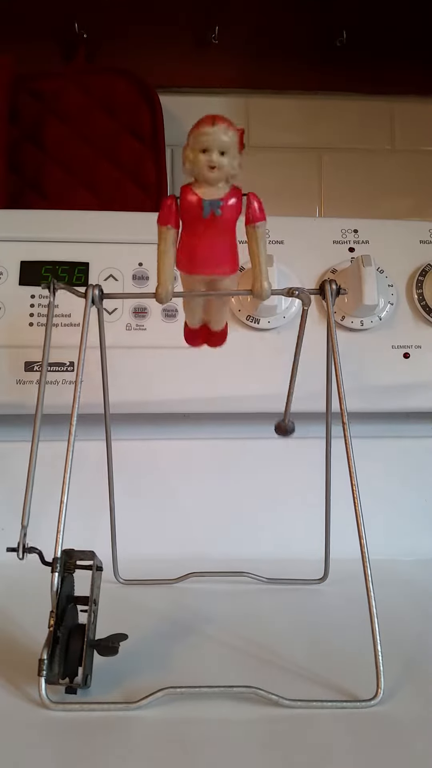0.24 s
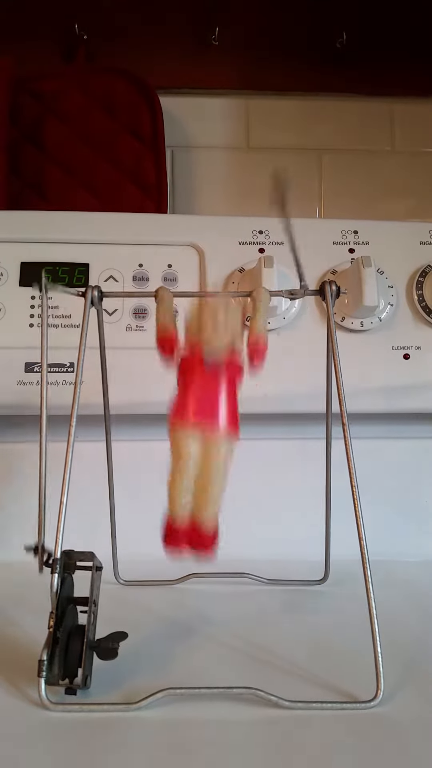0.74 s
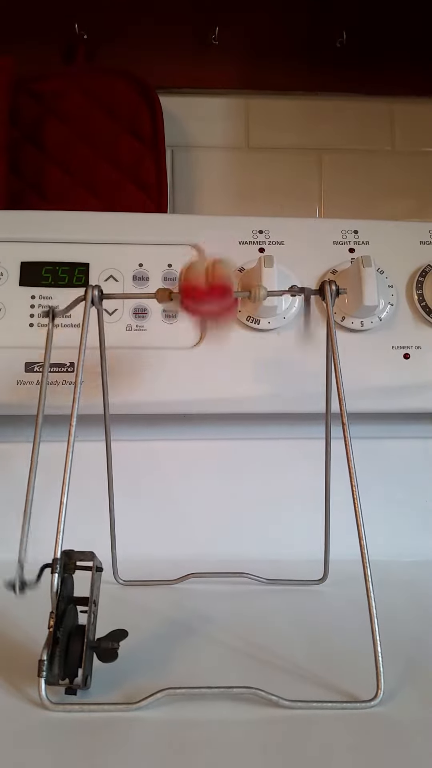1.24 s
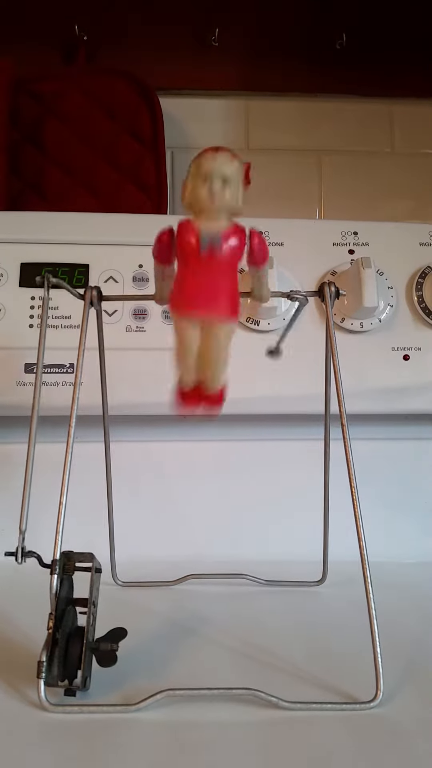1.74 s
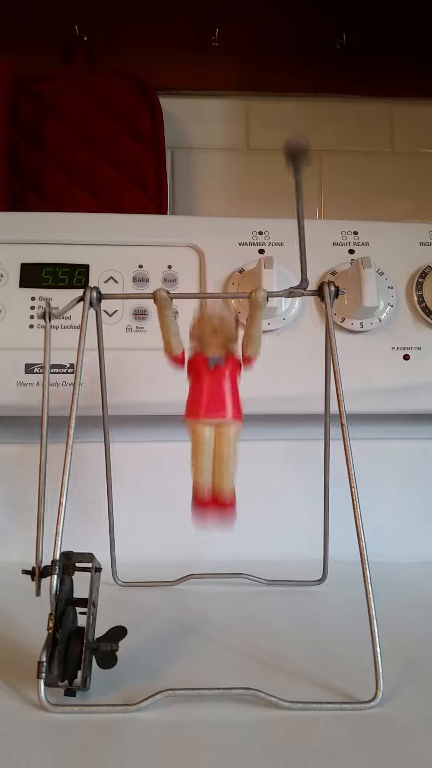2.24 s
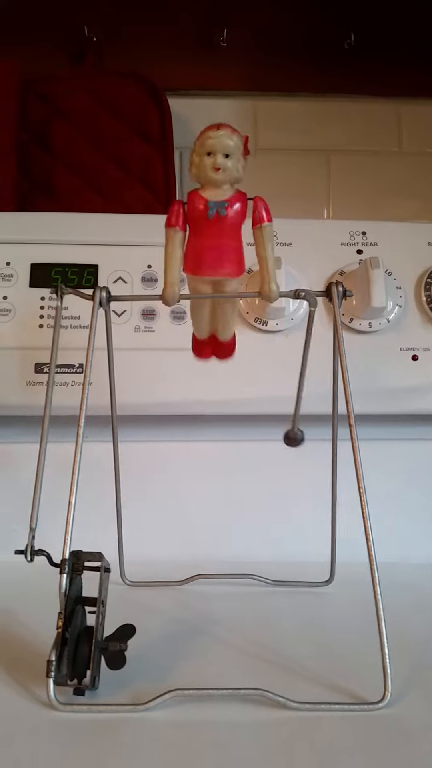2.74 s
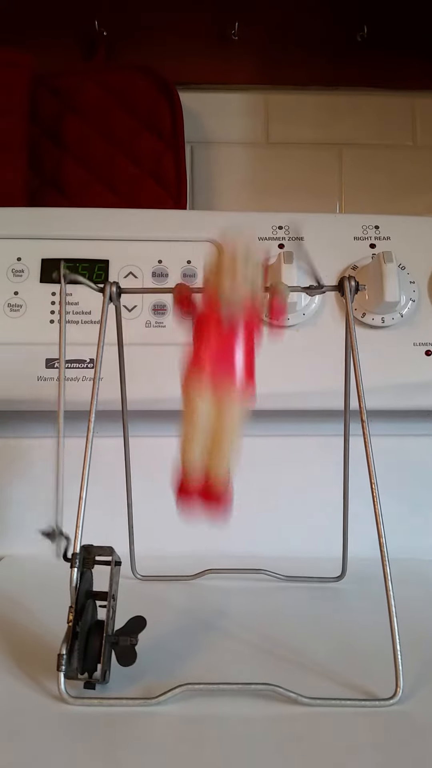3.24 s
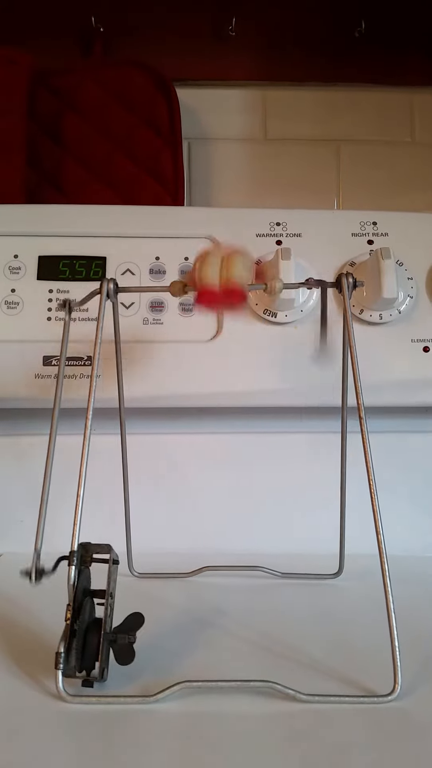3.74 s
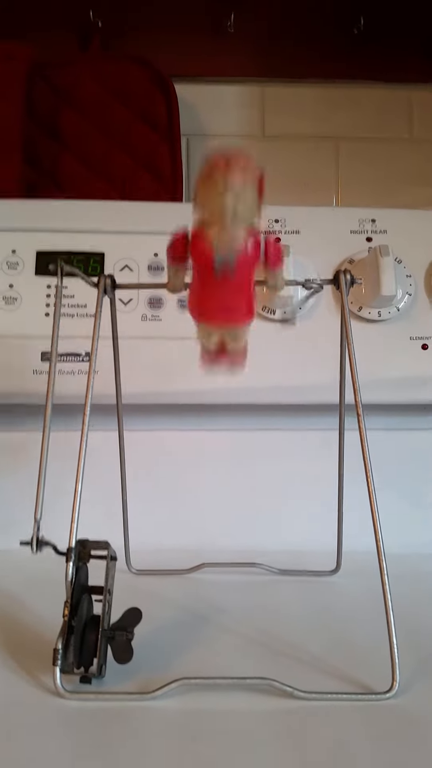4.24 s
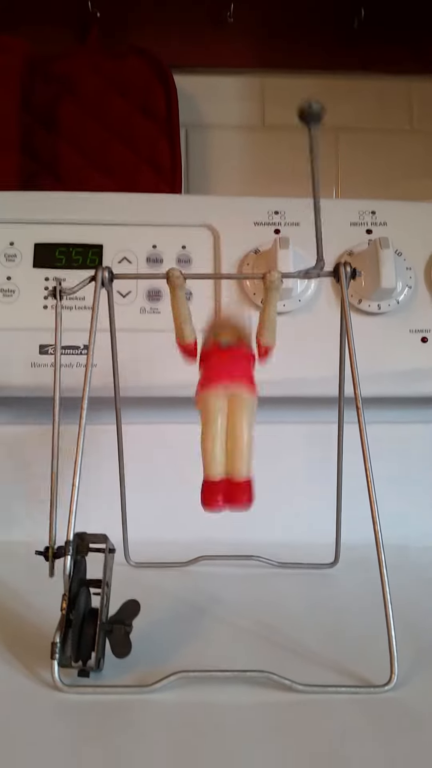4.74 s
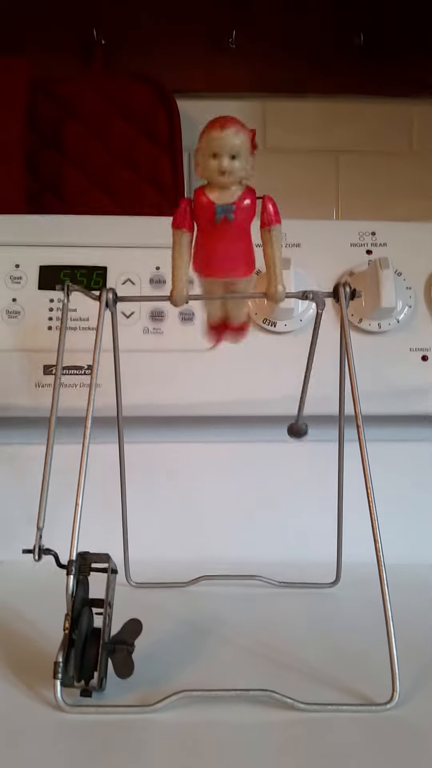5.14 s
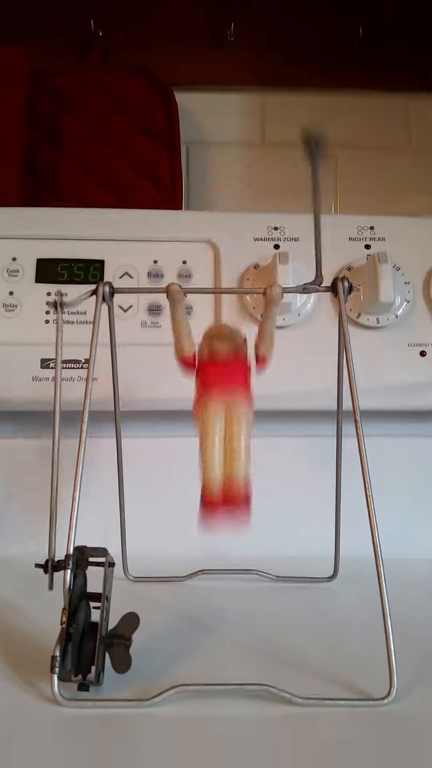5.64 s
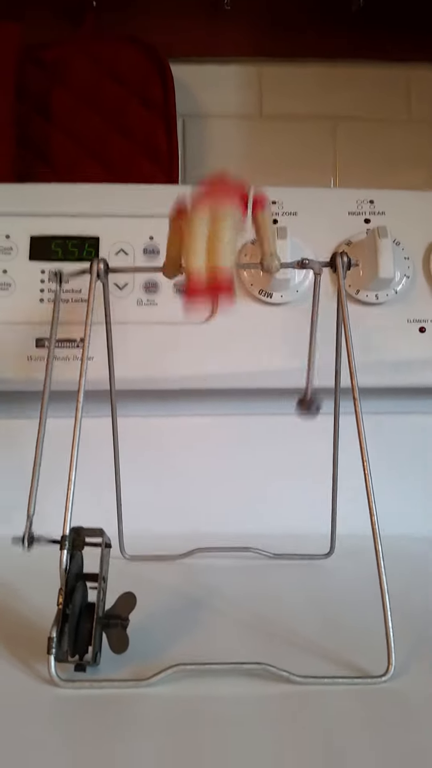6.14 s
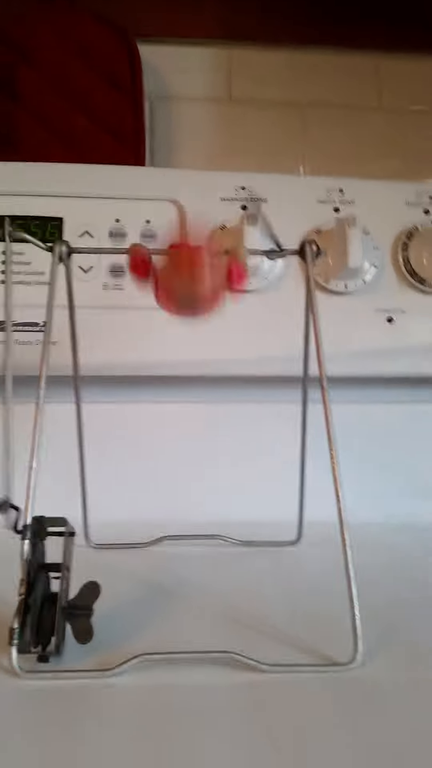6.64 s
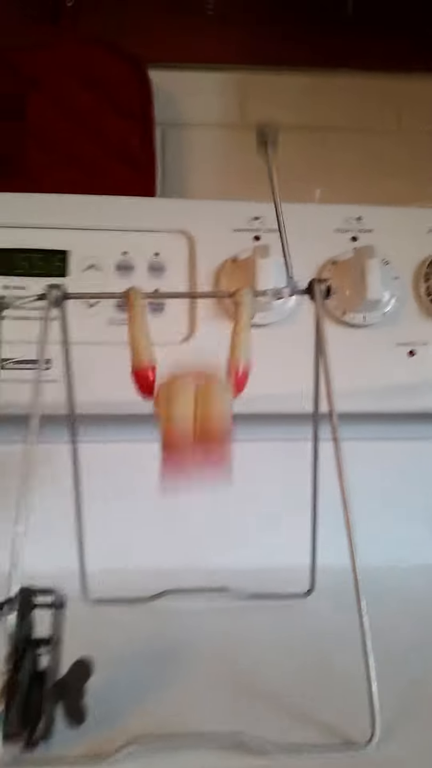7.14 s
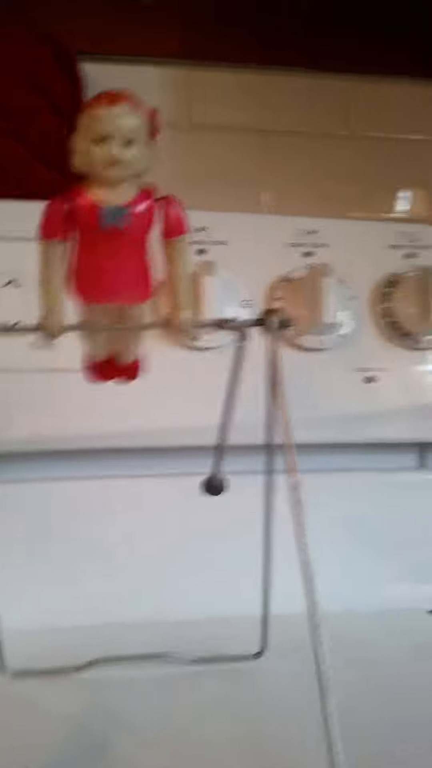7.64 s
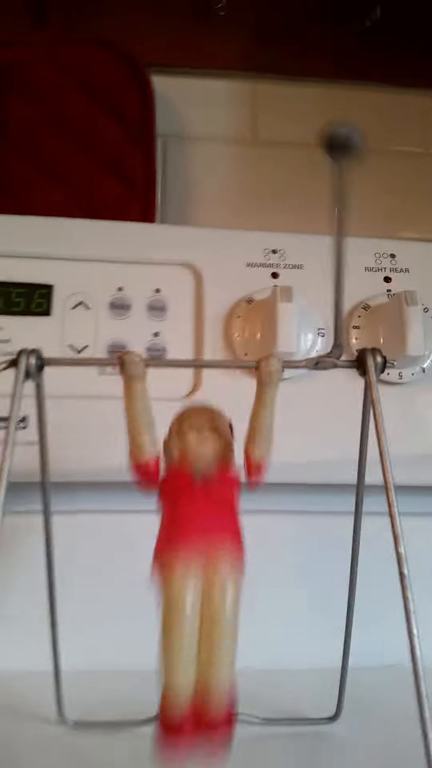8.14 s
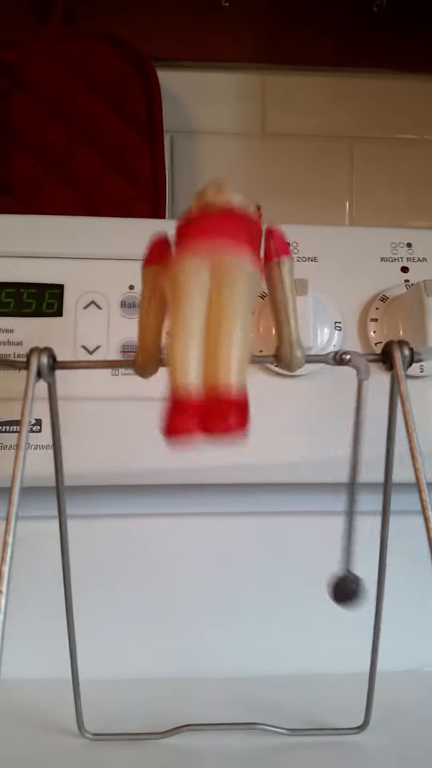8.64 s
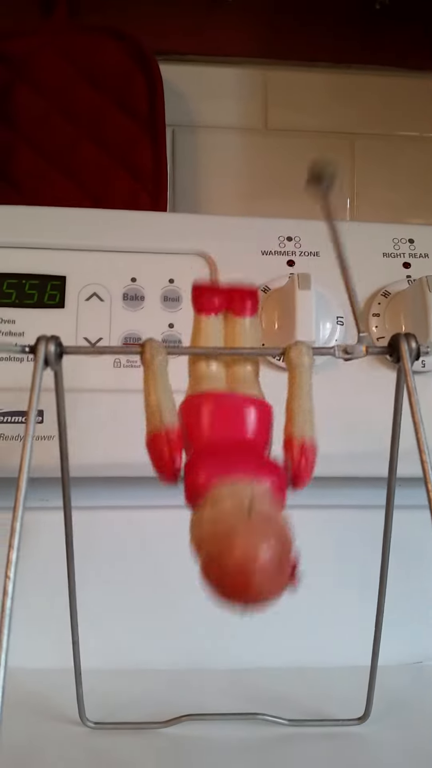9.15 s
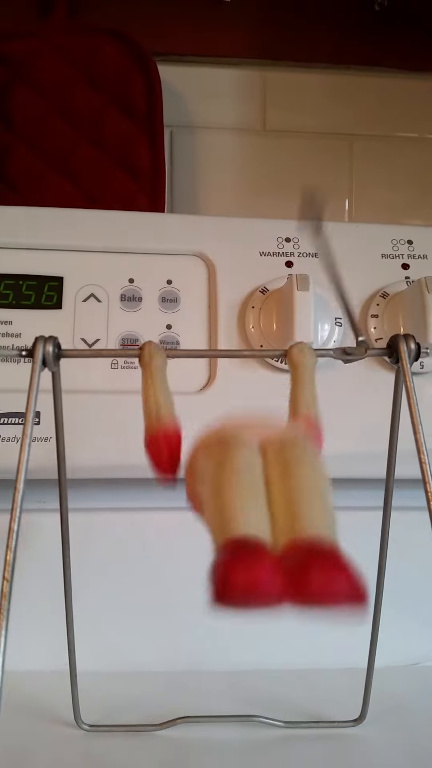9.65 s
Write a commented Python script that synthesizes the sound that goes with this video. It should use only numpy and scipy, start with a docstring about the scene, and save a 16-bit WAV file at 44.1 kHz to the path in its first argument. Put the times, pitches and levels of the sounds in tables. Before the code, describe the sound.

A wind-up acrobat toy ticks, clacks and knocks in uneven jerks on a metal stove top, with dull thumps and faint squeaks.

```python
"""From the start, quiet room air hisses, appliances drone and clockwork whirrs (shaped noise, sine tones).
Soon the crank jerks: gears tick, wire joints clack, a hollow acrobat knocks (bursts of noise, some ringing),
and the wire frame's feet thump a sheet-steel stove top (pushed resonances); the tiled kitchen echoes it all.
Now and then limbs slap the bar, and from 0.4 s a dry pivot squeaks (short wavering sines).
From 5.8 s fingers bump the hand-held phone (air pulses); around 7 s it turns away from the motor."""
import sys
import numpy as np
from scipy import signal
from scipy.fft import rfft, irfft, next_fast_len
from scipy.io import wavfile
from scipy.ndimage import uniform_filter1d, map_coordinates

SR = 44100
rng = np.random.default_rng(int(sys.argv[2]) if len(sys.argv) > 2 else 0)


def wav_out(sig):
    """Save sig, one row per channel (or a flat mono array), as 16-bit PCM at SR to the path in sys.argv[1]."""
    wavfile.write(sys.argv[1], SR, np.round(np.clip(np.atleast_2d(sig).T, -1, 1) * 32767).astype(np.int16))


N = 437031  # samples, about 9.9 s


def amp(db):
    """Turn decibels into a plain multiplier."""
    return 10 ** (np.asarray(db) / 20)


def unit(x):
    """Scale a signal to an rms of 1."""
    return x / np.sqrt(np.mean(x ** 2) + 1e-20)


def along(points, hz):
    """Read each column of (f/Hz, value, ..) rows on a log frequency axis."""
    f, *columns = np.transpose(points)
    return np.array([np.interp(np.log(hz + 1), np.log(f + 1), column) for column in columns])


def curves(rows):
    """Join (t/s, value, ..) rows with straight lines: one value per sample for each column."""
    seconds, *columns = np.transpose(rows)
    return [np.interp(np.arange(N) / SR, seconds, column) for column in columns]


def wobble(rate, size=N):
    """A smooth random curve through `rate` random points a second."""
    points = rng.standard_normal(int(size * rate / SR) + 4)
    return map_coordinates(points, [np.arange(size) * rate / SR])


def filtered(x, response):
    """Colour x by a frequency response whose mean power is made 1."""
    m = next_fast_len(N + SR // 2)
    gain = response(np.fft.rfftfreq(m, 1 / SR))
    gain = gain / np.sqrt(np.mean(abs(gain) ** 2))
    return irfft(rfft(x, m) * gain, m)[..., :N]


def modes(table):
    """A body rings at a few pitches: the wider a resonance, the sooner its ring dies."""
    def response(f):
        total = 0
        for k, (centre, width, db) in enumerate(table):
            resonance = 1j * f * width / (centre * centre - f * f + 1j * f * width)
            total = total + (-1) ** k * amp(db) * resonance  # neighbours have opposite signs
        return total
    return response


def chatter(s, db, life, rise, fall, lumps):
    """Strength of contact: each hit builds up, then falls 60 dB in its life, with uneven rebounds."""
    force, t = np.zeros(N + SR), np.arange(SR // 4) / SR
    for start, level, t60, up in zip(s, db, life, rise):
        build = (1 - np.exp(-1.5 * t / max(up, .0002))) ** 2
        decay = amp(level - 60 * (t / max(t60, .003)) ** fall)
        force[round(start * SR):][:len(t)] += decay * build
    return force[:N] * unit(lumps)


# how far the phone has turned away from the motor: t/s, share of the turn [0-1]
PHONE_TURN = [(0, 0.03), (6.7, 0.15), (7.3, 0.94), (8.5, 0.86), (9.91, 1)]


def turned(pair, gain):
    """Cross-fade from the colours facing the toy to those turned away; the right port hears later."""
    port_lag = 5 / SR  # s

    def lag(hz):
        return np.exp(-2j * np.pi * hz * port_lag * np.array([[0], [1], [0], [1]]))

    # rows: left facing, right facing, left turned, right turned
    heard = filtered(np.tile(pair, (2, 1)), lambda hz: gain(hz) * lag(hz))
    turn, = curves(PHONE_TURN)
    return heard[:2] * (1 - turn) + heard[2:] * turn


def ports(force, gain, alike, patchy_db=3):
    """Dense tiny impacts follow the force; patches of pitch and time stand out, partly shared by both ports."""
    z = signal.stft(rng.standard_normal((3, N)), nperseg=512)[2]
    patches = uniform_filter1d(rng.standard_normal(z.shape[1:]), size=3, axis=0)  # smooth over pitch
    patches = uniform_filter1d(patches, size=4, axis=1)  # smooth over time
    patchy_noise = signal.istft(z * amp(patchy_db * unit(patches)), nperseg=512)[1][:, :N]
    shared, *own = unit(patchy_noise)
    share = np.clip(alike, 0, 1)
    impacts = np.sqrt(share) * shared + np.sqrt(1 - share) * np.array(own)
    return turned(force * impacts, gain)


# colour of the quiet room air: f/Hz, relative level/dB per Hz
ROOM_AIR = [(15, -33), (25, -1.5), (170, -6.5), (223, 9.5), (317, -16), (405, -2), (677, -3.5),
            (1070, -14.5), (2350, -32.5), (5280, -47.5), (16000, -46.5)]
# appliances droning: f/Hz, level/dB before a 4.5 dB lift and wavering
APPLIANCES = [(48, -70), (288, -75)]


def background():
    """Room air is shaped noise; appliances drone as tones with slowly wavering level and phase."""
    air = unit(filtered(rng.standard_normal((2, N)), lambda hz: amp(along(ROOM_AIR, hz))))
    t, hum = np.arange(N) / SR, 0
    for hz, db in APPLIANCES:
        level = amp(db + 4.5 + 3.4 * wobble(2.6))
        hum = hum + level * np.sin(2 * np.pi * hz * t + 1.7 * wobble(3.6))
    return amp(-65) * air + hum


# how hard the clockwork runs between jerks: t/s, whirr level/dB before each layer's own trim
CLOCKWORK = [(0,-68),(.4,-75),(.72,-59.5),(1.1,-76),(1.45,-60.5),(2.13,-78.5),(2.4,-73),(2.87,-80),(3.15,-60.5),(3.6,-79.5),(4.04,-61),(4.62,-74),(4.71,-65.5),(5.45,-67.5),(5.8,-70),(6.9,-60),(7.13,-80.5),(7.4,-66.5),(7.9,-81.5),(8.25,-63),(8.66,-88.5),(9.05,-70),(9.91,-67.5)]
# loose metal parts clashing: t/s, gear tick level/dB before a 3.5 dB lift,
# wire joint level/dB above the tick, tick chatter time [s]
CLASHES = [(.059,-24,-9,0.11),(.2345,-28,-5,0.011),(.237,-30,-8,0.034),(.258,-40.5,2.5,0.043),(.292,-48,6,.028),(.455,-53,2.5,0.1),(.524,-36.5,1,0.033),(.574,-49,-1.5,0.082),(.611,-21,-6,0.094),(.706,-37,-3.5,.041),(.765,-47,-17.5,0.017),(.853,-33,-6,.03),(.86,-19,-21,0.041),(.869,-18,-7,.051),(.89,-33.5,-0.5,.033),(.906,-42,-2.5,0.18),
           (1.196,-22,-5,.028),(1.203,-30,-1.5,0.047),(1.23,-38,5.5,.051),(1.325,-21,-16,0.013),(1.327,-20.5,-5.5,0.088),(1.403,-44,3,.048),(1.493,-48,-12,.012),(1.514,-40,-11,.012),(1.527,-46,-1,.04),(1.551,-31,-6,0.035),(1.564,-30,-1.5,0.051),(1.689,-17.5,-31,.021),(1.695,-19.5,-5.5,.059),(1.855,-51,3,.12),(1.931,-35.5,1.5,.03),
           (2.187,-24,-8.5,.051),(2.213,-47,1,.051),(2.291,-48.5,-5,0.043),(2.373,-56.5,-5.5,0.016),(2.399,-52.5,12.5,.018),(2.406,-43.5,-6,.031),(2.527,-23,-11,0.064),(2.636,-26.5,-11.5,.037),(2.652,-31,2.5,.023),(2.689,-42.5,2.5,0.055),(2.774,-44.5,-1,.029),(2.957,-40.5,4,.04),
           (3.03,-47,-3,.03),(3.06,-20,-7,.078),(3.097,-37,-3,.077),(3.153,-42,4,0.069),(3.297,-30,2,0.01),(3.319,-15,-30,.021),(3.324,-18.5,-5,0.034),(3.337,-32,-2,0.12),(3.688,-28.5,0,0.03),(3.697,-34.5,0,0.064),(3.842,-31.5,-6,0.045),(3.848,-17.5,-9.5,0.055),(3.883,-35.5,9,0.029),(3.933,-44,-4,.13),(3.977,-36.5,-1,.048),
           (4.002,-32.5,1.5,0.019),(4.04,-47.5,4,0.087),(4.072,-36,-4,.02),(4.083,-27.5,-1,0.029),(4.235,-36,-6,.04),(4.244,-14.5,-20,0.022),(4.251,-20.5,-5.5,0.055),(4.475,-41,11.5,0.025),(4.7,-65,-3,.05),(4.717,-27,-1,.087),(4.836,-64,15,0.12),(4.918,-42,7,.036),(4.943,-41.5,10.5,0.038),
           (5.065,-20.5,-6,.097),(5.192,-20,-6.5,.025),(5.205,-31,2,.054),(5.252,-36,4,.024),(5.327,-41.5,3,0.031),(5.421,-49,-19,0.0098),(5.508,-49,4,0.033),(5.534,-30,4.5,.025),(5.627,-25.5,-4,0.054),(5.637,-18,-5,0.074),(5.68,-39,5,0.12),(5.728,-36,0.5,.054),(5.794,-48,2.5,.028),(5.835,-45.5,9,0.048),(5.852,-43,5,0.17),(5.882,-13,-14,0.03),(5.891,-22,-1,.065),(5.986,-44,3.5,0.063),
           (6.156,-50.5,10,0.013),(6.211,-21,-2.5,0.012),(6.218,-24.5,3.5,0.036),(6.249,-46,9,0.026),(6.34,-22.5,-1.5,0.052),(6.355,-23.5,-1,0.027),(6.381,-43,7,0.04),(6.4915,-32,-1,0.011),(6.497,-37,3.5,0.04),(6.544,-32.5,-9,0.025),(6.578,-18,-8,0.019),(6.732,-16.5,-10,0.077),(6.977,-35.5,-9.5,.085),
           (7.2,-33,-5.5,.11),(7.324,-61.5,6,.073),(7.398,-53,10,0.031),(7.425,-48.5,7.5,.051),(7.548,-28.5,-8.5,0.1),(7.6742,-26,-5,.012),(7.678,-31.5,-4.5,.037),(7.689,-39.5,2,.075),(7.796,-48.5,3.5,.027),
           (8.001,-44.5,4.5,0.028),(8.108,-28,-3.5,.086),(8.193,-45,2,0.099),(8.264,-62,-9,.02),(8.337,-58,1,.04),(8.373,-28,-4.5,0.093),(8.7367,-41,5,0.017),(8.74,-46,4,.078),(8.906,-46,-3,0.045),(8.914,-33,-2,0.083),
           (9.14,-58,6,0.023),(9.164,-42,2,.02),(9.182,-40.5,3,0.034),(9.35,-48,-3,.04),(9.356,-34,-6.5,0.05),(9.362,-32.5,-2,0.088),(9.498,-53.5,9.5,.04),(9.533,-47,6,.015),(9.54,-55,10,0.12),(9.592,-30.5,3.5,.016),(9.699,-48,4.5,.063),(9.758,-27,-2.5,.08)]
# colour of the gears: f/Hz, then level/dB at left, right, left turned away, right turned away
GEAR_COLOUR = [(6000, -41, -26, -48.5, -54.5), (8450, -24.5, -12, -11.5, -16),
               (9240, -16.5, -16, -20, -0.5), (10550, -25.5, -4.5, -15, -5.5), (11750, -18, 2.5, -12, -8.5),
               (12940, -20.5, -12.5, -27.5, -7.5), (13800, -24, -15, -17, -10.5),
               (15370, -19.5, -25, -8.5, -9.5), (15800, -30.5, -23, -23, -19)]
# colour of the wire joints: f/Hz, then level/dB at left, right, left turned away, right turned away
WIRE_COLOUR = [(302, -12.5, 0.5, -18, -27), (1249, -7, -4, -5.5, -5), (2270, -12.5, -6, -9, -23),
               (3050, -12, -9.5, -9.5, -19), (4500, -6, -5.5, -1, -13.5), (5340, -2.5, -4.5, 3, -15),
               (5830, -4.5, -3, 1, -15.5), (7700, -3.5, -13, -1.5, -13), (8970, -18, -14.5, -9, -19.5),
               (10000, -40, -29, -34.5, -41.5)]


def metal():
    """Gear teeth tick brightly, wire joints clack lower; the gear train whirrs and drops stray ticks."""
    s, db, wire_db, life = np.transpose(CLASHES)
    whirr_db, = curves(CLOCKWORK)
    whirr = amp(whirr_db + 4.7 * wobble(60))

    # small chance ticks, 22 a second; those past the end are dropped
    at = rng.random(400) * 400 / 22
    size, tone = rng.standard_normal((2, 400))
    inside = at < N / SR
    stray_db = whirr_db[(at[inside] * SR).astype(int)] + 11.5 + 4 * size[inside]  # follows the whirr
    s, db = np.r_[s, at[inside]], np.r_[db, stray_db]
    wire_db = np.r_[wire_db, 3 + 5 * tone[inside]]
    life = np.r_[life, np.full(inside.sum(), 0.013)]

    rise = 0.057 * life
    rebounds = wobble(140)  # both layers shake with the same rebounds
    tick_lumps = amp(0.91 * rebounds + 3.84 * wobble(400))
    ticks = chatter(s, db + 3.5, life, rise, fall=1.35, lumps=tick_lumps)
    ticks += amp(-0.9) * whirr
    clack_lumps = amp(1.9 * rebounds + 2.5 * wobble(300))
    clacks = chatter(s, db + wire_db + 3.5, 1.293 * life, 2.06 * rise, fall=1.404, lumps=clack_lumps)
    clacks += amp(3.5) * whirr
    gears = ports(ticks, lambda hz: amp(along(GEAR_COLOUR, hz)), alike=0.17)
    return gears + ports(clacks, lambda hz: amp(along(WIRE_COLOUR, hz)), alike=0.24)


# blows on the hollow figure: t/s, level/dB before each layer's lift, chatter time [s]
BLOWS = [(.071,-36.5,0.09),(0.231,-26,0.034),(.287,-32,0.036),(0.523,-26.5,0.024),(0.544,-37,.026),(.613,-33.5,0.056),(0.643,-38,0.036),(0.697,-32,0.043),(.811,-39,0.029),(0.869,-34,0.054),(.941,-40,0.071),
         (1.021,-47,0.052),(1.153,-44,0.013),(1.197,-19.5,0.015),(1.205,-31,0.064),(1.299,-42,.02),(1.324,-30.5,0.13),(1.41,-34,0.027),(1.527,-27,0.015),(1.551,-26,0.033),(1.696,-24.5,0.032),(1.854,-37.5,.033),(1.931,-31,0.037),
         (2.199,-26.5,0.014),(2.214,-31,.026),(2.534,-34,0.08),(2.634,-23.5,0.032),(2.654,-33,0.051),(2.696,-36,0.026),(2.774,-41.5,0.032),(2.96,-29.5,.028),
         (3.03,-44.5,0.057),(3.063,-31,0.082),(3.15,-34,0.12),(3.297,-28,0.01),(3.327,-26,0.028),(3.412,-35.5,.04),(3.686,-26.5,0.069),(3.852,-28.5,0.061),(3.98,-30.5,.021),
         (4.002,-23.5,0.019),(4.02,-29.5,0.037),(4.084,-20.5,0.023),(4.252,-33.5,0.1),(4.377,-41,.04),(4.407,-41,0.12),(4.475,-22.5,0.025),(4.694,-41.5,0.089),(4.727,-23.5,0.069),(4.943,-32.5,0.025),
         (5.075,-27.5,0.084),(5.191,-17.5,0.031),(5.212,-21.5,0.024),(5.25,-28.5,0.024),(5.326,-36.5,0.021),(5.431,-52,.049),(5.536,-20.5,0.024),(5.637,-21,0.064),(5.694,-35,0.016),(5.722,-24.5,0.065),(5.753,-24,0.019),(5.9,-25,0.036),
         (6.149,-38,0.047),(6.207,-23,0.073),(6.351,-23,0.025),(6.372,-43,.036),(6.488,-25.5,0.012),(6.499,-34,0.094),(6.578,-31,0.038),(6.739,-26.5,0.057),(6.862,-38,0.021),(6.978,-35.5,0.05),
         (7.212,-28.5,0.097),(7.326,-46.5,0.039),(7.426,-37,0.032),(7.561,-34.5,0.068),(7.672,-27,0.061),(7.73,-35.5,0.019),(7.798,-43.5,.024),(7.974,-43.5,0.036),
         (8.002,-38,0.047),(8.111,-32.5,0.084),(8.185,-36.5,0.013),(8.204,-31.5,.039),(8.231,-36.5,0.026),(8.339,-37,0.02),(8.384,-33,0.043),(8.735,-33,0.049),(8.916,-43.5,0.08),
         (8.99,-46,0.065),(9.1,-48,.03),(9.122,-39.5,0.017),(9.145,-35,0.022),(9.162,-34,.02),(9.183,-28.5,0.019),(9.366,-34,0.073),(9.497,-42,0.041),(9.527,-43,0.089),(9.59,-28,0.037),(9.697,-41.5,0.16),(9.766,-24.5,0.06),(9.791,-29,.023)]
# limbs slapping the bar, short and broad: t/s, level/dB
LIMB_SLAPS = [(.234, -35), (1.196, -33), (1.552, -31), (1.573, -30), (3.689, -35), (4.086, -23),
              (4.477, -32), (5.535, -35), (6.211, -32), (6.579, -32), (7.674, -37), (9.592, -29)]
# resonances of the thin shell: f/Hz, width [Hz], relative level/dB
SHELL_MODES = [(832, 56, -10), (1078.5, 98.5, 2.5), (1224.3, 60, 2), (1590, 20, -23), (1599, 35, -14.5),
               (1962, 200, -14.5), (2706, 60, -14)]
# resonances of the air inside: f/Hz, width [Hz], relative level/dB
BELLY_MODES = [(314.5, 730, -15), (472.5, 19.6, 4), (607, 73, -0.5), (768, 140, -23)]
# broad resonances of the limbs: f/Hz, width [Hz], relative level/dB
LIMB_MODES = [(815, 320, 3), (1730, 530, 0), (2230, 1300, -11.5)]
# balance of the figure: level/dB at left, right, left turned away, right turned away
FIGURE_BALANCE = (-2, 3, -0.5, -0.9)


def figure():
    """The hollow shell rings near 1 kHz, the air inside an octave lower; limbs slap with hardly any ring."""
    s, db, life = np.transpose(BLOWS)
    rise = 0.073 * life
    # harder blows favour the shell over the belly
    belly_db = -10 - 0.38 * (db + 29.5) + 2 * rng.standard_normal(len(s))
    at_ports = amp(FIGURE_BALANCE)[:, None]

    shell = chatter(s, db + 1.5, life, rise, fall=1.48, lumps=amp(1.2 * wobble(200)))
    # the figure buzzes on its bar with the whirr, louder as the phone turns
    shell += amp(curves(CLOCKWORK)[0] + 3.5 + 3.5 * curves(PHONE_TURN)[0] + 3.8 * wobble(50))
    belly = chatter(s, db + belly_db + 3.0, life, rise, fall=1.68, lumps=amp(1.5 * wobble(150)))
    s, db = np.transpose(LIMB_SLAPS)
    slap_life, slap_rise = np.full(len(s), .04), np.full(len(s), .0008)  # s
    limbs = chatter(s, db, slap_life, slap_rise, fall=1.46, lumps=amp(4.3 * wobble(300)))

    def heard(force, body, alike):
        return ports(force, lambda hz: at_ports * modes(body)(hz), alike)

    return heard(shell, SHELL_MODES, .7) + heard(belly, BELLY_MODES, .85) + heard(limbs, LIMB_MODES, .6)


# the frame's feet jolting the stove top: t/s, level/dB before a 21 dB lift
JOLTS = [(0.075, -28), (0.234, -34), (0.624, -26.5), (0.867, -31), (1.194, -34), (1.343, -28),
         (1.702, -29.5), (2.201, -34.5), (2.539, -30), (2.633, -36), (3.079, -27), (3.332, -28.5),
         (3.686, -35.5), (3.863, -27), (4.257, -27), (4.353, -36), (4.487, -43.5), (4.734, -20),
         (4.87, -33), (5.076, -22.5), (5.197, -27.5), (5.332, -33), (5.537, -37), (5.649, -20),
         (5.69, -30.5), (5.897, -20.5), (6.213, -20.5), (6.356, -24), (6.608, -39.5), (6.744, -28),
         (7.212, -28.5), (7.413, -38), (7.563, -34), (7.668, -32.5), (7.995, -45.5), (8.128, -31.5),
         (8.211, -41), (8.377, -40), (8.736, -46), (8.923, -42), (9.361, -42.5), (9.582, -48),
         (9.763, -40.5)]
# the steel trembling all the while: t/s, level/dB before wavering
STEEL_TREMBLE = [(0,-61.5),(1.45,-58),(2.13,-70),(3.1,-52.5),(3.6,-60.5),(4.7,-52.5),(5.45,-53),(5.8,-46),(6.45,-57.5),(7.1,-58.5),(8.25,-64),(8.66,-77.5),(9.91,-66)]
# resonances of the steel panel: f/Hz, width [Hz], relative level/dB
STOVE_MODES = [(55, 41, -16), (102.2, 24, 0.5), (131.2, 27, -1.5), (160, 52.7, -5.5), (248, 43, -7),
               (288, 71, -13.5)]
# balance of the boom: f/Hz, then level/dB at left, right, left turned away, right turned away
BOOM_BALANCE = [(150, -8, 4, -5, -0.5), (300, 3, -5, -0.5, 8)]


def stove():
    """Very short pushes set the steel panel booming; it trembles a little all the while."""
    def gain(hz):
        return amp(along(BOOM_BALANCE, hz)) * modes(STOVE_MODES)(hz)

    pushes = np.zeros(N)
    for s, db in JOLTS:
        pushes[round(s * SR)] = amp(db + 21)
    tremble = amp(curves(STEEL_TREMBLE)[0] + 1.7 * wobble(17))
    return turned(np.array([pushes, pushes]), gain) + ports(tremble, gain, alike=0.67)


# how long the tiled kitchen echoes: f/Hz, time to fall 60 dB [s]
ECHO_TIME = [(100, 0.29), (500, 0.3), (1500, 0.22), (4000, .28), (10000, 0.21)]


def kitchen(x, count=4):
    """Each pitch dies at its own speed; a few diffuse echo patterns take turns."""
    hz, t, z = signal.stft(rng.standard_normal((count, 2, SR // 2)), SR, nperseg=256)
    tails = signal.istft(z * amp(-60 * t / along(ECHO_TIME, hz).T), SR, nperseg=256)[1]
    turn_of_tail = np.arange(N) * 8 // SR % count  # the next echo pattern every 1/8 s
    echo = 0
    for k, tail in enumerate(tails):
        tail = tail / np.linalg.norm(tail[0])
        echo = echo + signal.fftconvolve(x * (turn_of_tail == k), tail, axes=1)[:, :N]
    return echo


# a dry pivot squeaking: t/s of the loudest point, f/Hz, level/dB before wavering and the port trim,
# length [s] from that point to about a third of it
SQUEAKS = [(.438, 5660, -56, 0.007), (1.42, 5240, -51, .012), (3.126, 5370, -39.5, 0.0094),
           (3.953, 5380, -36.5, 0.0067), (5.991, 5710, -40.5, 0.016), (6.023, 5480, -44, 0.014),
           (6.458, 5340, -45, .01), (7.567, 5400, -51, .01)]


def pivot():
    """Stick and slip at one unsteady pitch, swelling and fading."""
    t, tone = np.arange(-1500, 1500) / SR, np.zeros(N)
    for s, hz, db, length in SQUEAKS:
        level = amp(db + 2.5 * wobble(200, len(t))) * np.exp(-(t / length) ** 2)
        wave = np.sin(2 * np.pi * hz * t + 0.93 * wobble(150, len(t)))
        tone[round(s * SR) - 1500:][:len(t)] += level * wave
    return tone * amp([[1.5], [-1.5]])  # left, right


# fingers shifting on the phone: t/s, level/dB at the right port
GRIP_SHIFTS = [(5.773, -21.5), (5.816, -12), (5.857, -18), (5.878, -19.5), (5.909, -18), (6.686, -27),
               (6.704, -32), (6.756, -22)]


def hand():
    """Each shift of the grip sucks, pushes, then weakly sucks the air, without ring."""
    t, air = np.arange(-400, 800) / SR, np.zeros(N)
    suck = np.exp(-(t / 0.00067) ** 2)
    push = 0.88 * np.exp(-((t - .003) / 0.0014) ** 2)
    last_suck = 0.42 * np.exp(-((t - .007) / 0.00067) ** 2)
    for s, db in GRIP_SHIFTS:
        air[round(s * SR) - 400:][:len(t)] += amp(db) * (push - suck - last_suck)
    return air * amp([[-14], [0]])  # left, right


def scene():
    """Add the toy and stove, their kitchen echo, the hand and the background."""
    bright, dull, boom = metal() + pivot(), figure(), stove()
    echo = kitchen(amp(-4.5) * bright + amp(-3.5) * dull + amp(2.0) * boom)
    return bright + dull + boom + echo + hand() + background()


# both ports lose the top treble: f/Hz, level/dB
PORT_TREBLE = [(15700, 0), (16000, -25.5), (16800, -36)]


def record(dry):
    """The phone's top treble falls away and nothing is kept from 16.8 kHz up."""
    m = next_fast_len(N + SR // 2)
    hz = np.fft.rfftfreq(m, 1 / SR)
    response = amp(along(PORT_TREBLE, hz)) * (hz < 16800)
    return irfft(rfft(dry, m) * response, m)[:, :N]


dry = scene()
out = record(dry)
wav_out(out)
```